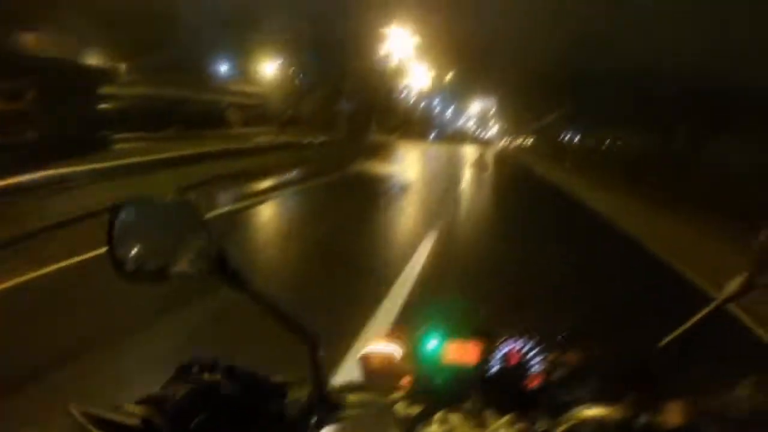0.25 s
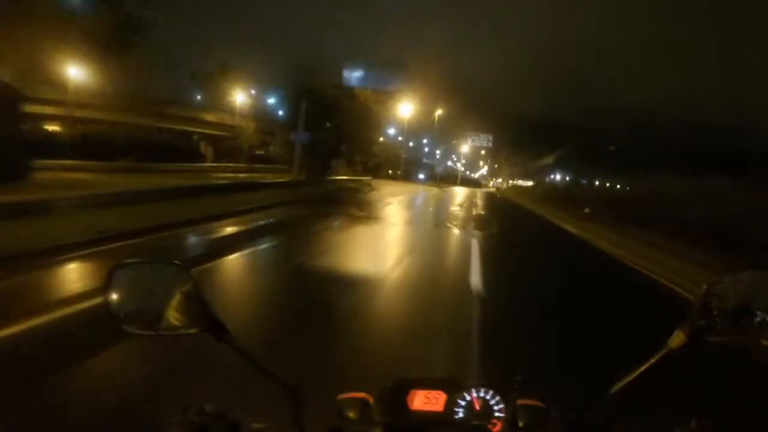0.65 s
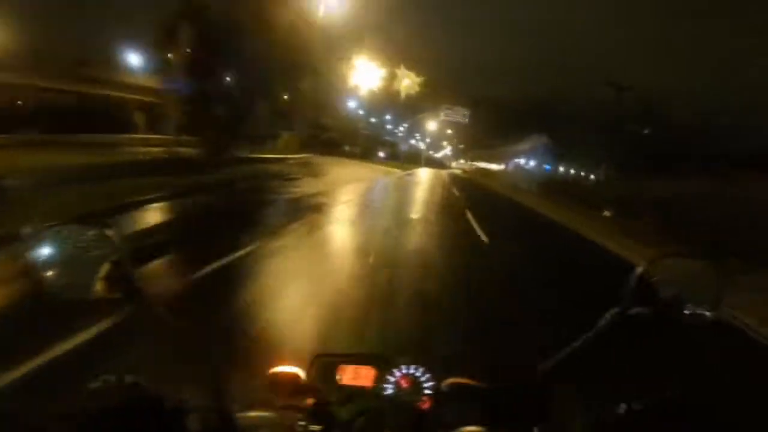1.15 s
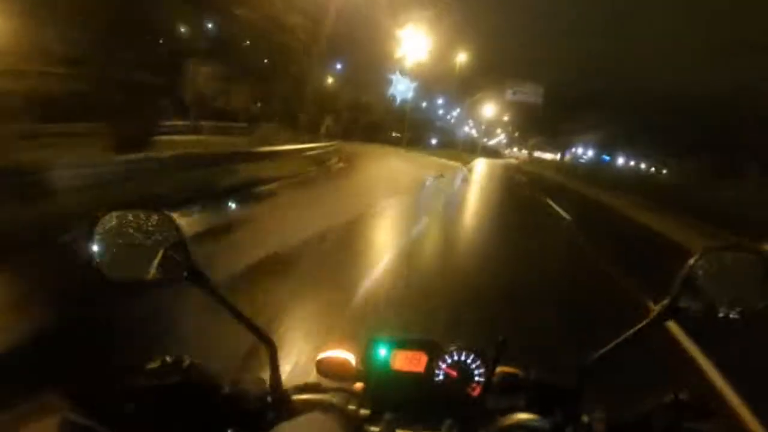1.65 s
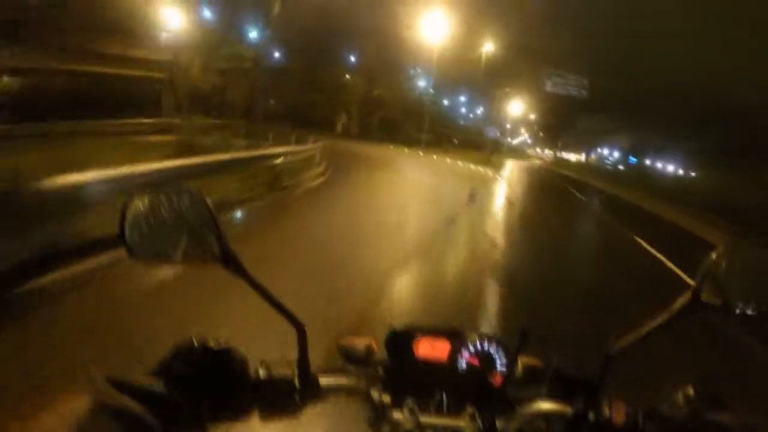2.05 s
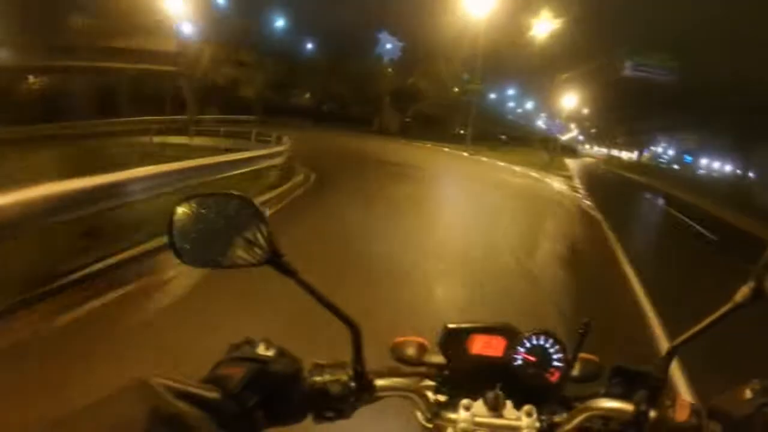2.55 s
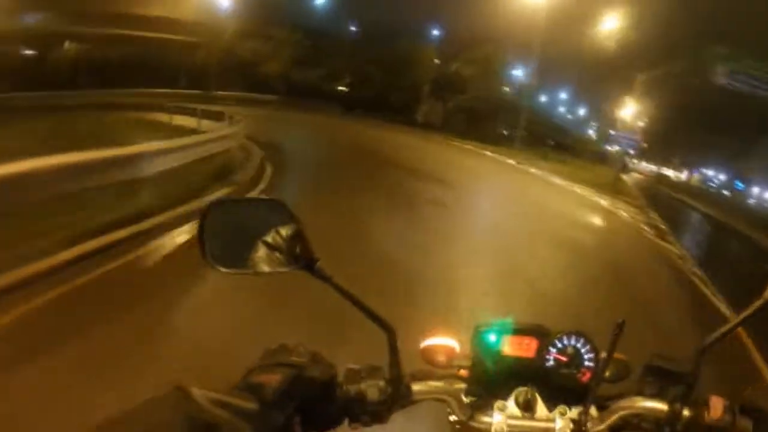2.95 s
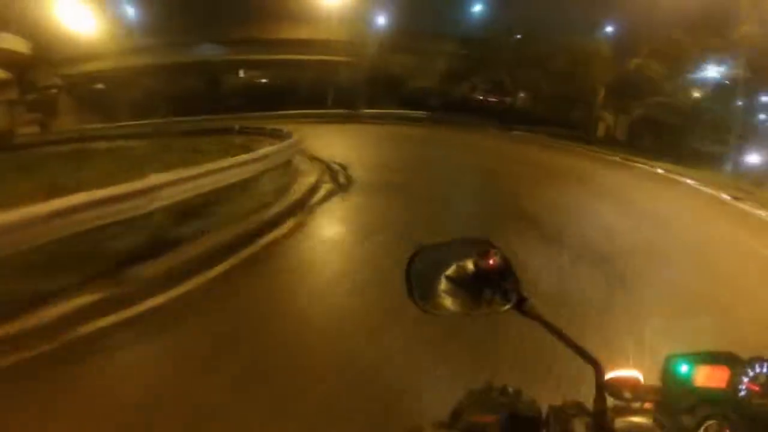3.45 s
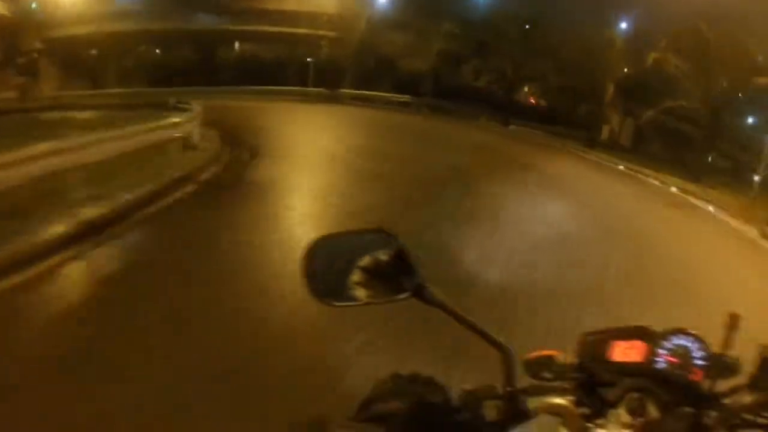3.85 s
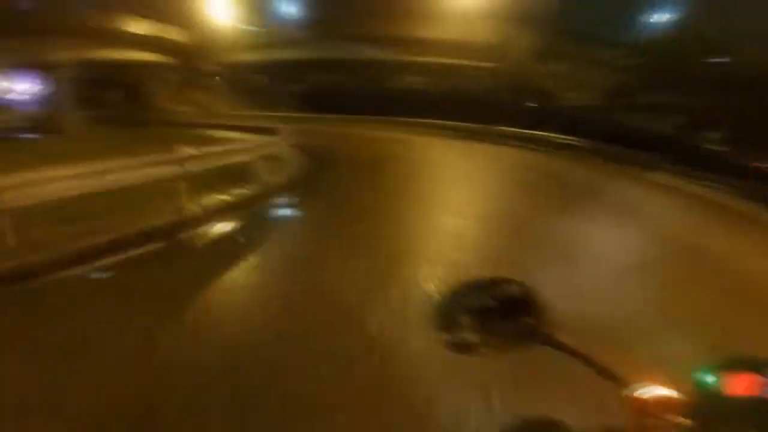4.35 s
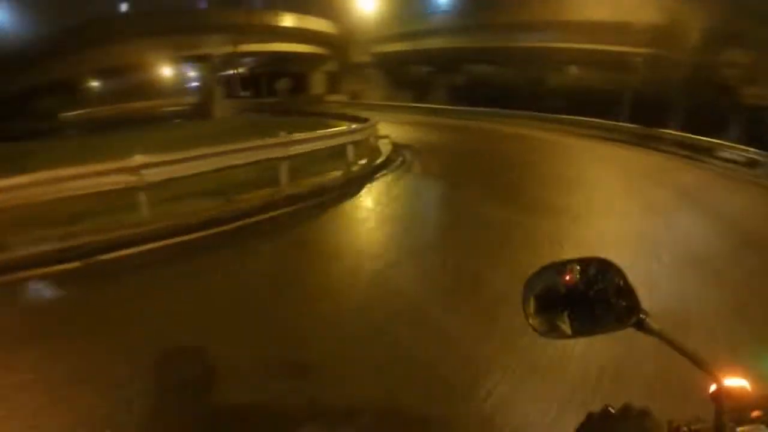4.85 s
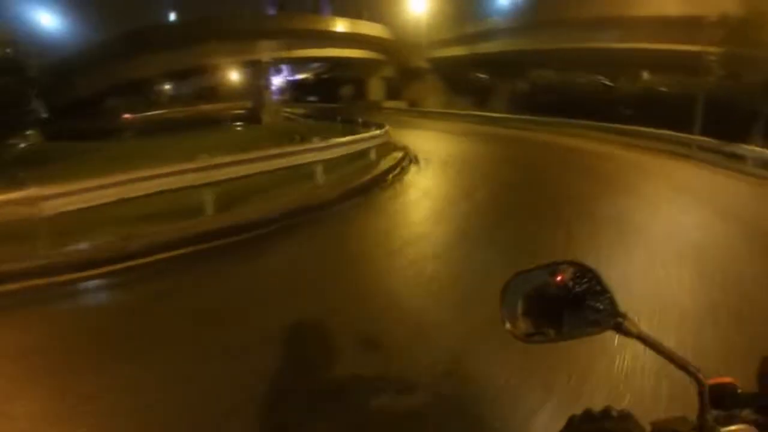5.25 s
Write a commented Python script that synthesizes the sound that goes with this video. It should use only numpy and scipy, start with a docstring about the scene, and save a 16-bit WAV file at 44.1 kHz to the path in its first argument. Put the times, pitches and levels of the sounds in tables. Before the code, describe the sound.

A single-cylinder motorcycle slows on a wet road, heard close from the rider's helmet. For the first second, heavy low wind thumps hit the microphone over a gritty, hollow rush of air, tyre roar and hissing spray. These ease steadily as the faint engine note sinks until about 4 seconds. From around 0.8 seconds a high, throbbing rasp of gears and chain with thin squeals comes in, strongest between 1.3 and 2.6 seconds, then fading. Loose parts knock near 1.8 seconds, a small metal ping comes at 2.5, and a sharp clack at 2.9. The chain ticks rapidly around 3.5 to 4 seconds, in the quietest stretch, ending with a click. At about 4.2 seconds the throttle opens gently with soft intake noise and exhaust puffs. Parts rattle from 4.4 to 4.7 and again near 5.1, while light valve ticking and low rumble continue to 5.5 seconds.

```python
"""A single-cylinder motorcycle slows on a wet road at night, heard close from a helmet microphone.
On the overrun its gears and chain rasp in step with the sinking crank speed; it leans into a ramp
and the throttle opens again. Wind buffets the helmet right at the microphone and the tyres hiss
through the water below, coloured by the hollow camera housing. Loose parts click over bumps."""
import sys
import numpy as np
from scipy import signal
from scipy.fft import rfft, irfft
from scipy.io import wavfile
from scipy.ndimage import uniform_filter1d

SR = 44100
rng = np.random.default_rng(int(sys.argv[2]) if len(sys.argv) > 2 else 0)


def dump_mix(stems):
    """Bounce the given channels to the path in sys.argv[1] as a 16-bit WAV at rate SR."""
    frames = np.atleast_2d(stems).T  # one column per channel
    limited = np.clip(frames, -1, 1)  # hard clip at full scale
    pcm = np.round(limited * 32767).astype(np.int16)
    wavfile.write(sys.argv[1], SR, pcm)


N = 242991
TIME = np.arange(N) / SR
TICK_PEAK_S, SIZZLE_PEAK_S = 3.666, 1.156  # these also align the rasp's throb and the valve ticks
# spectrum of small eddies and exhaust puffs: f/Hz, level/dB
EDDY_SPECTRUM = [(70, -2.5), (95, 0), (115, -0.5), (135, -5.5), (165, -9), (260, -39)]


def gear_rasp(turns):
    """Slack gears rub harder at fixed crank angles; modes near the rubbing's centre ring most."""
    # rubbing of gears and chain: t/s, level/dB, centre f/Hz
    rubbing = [(0, -79, 4400), (.6, -72, 4300), (.8, -56, 4200), (1.1, -60, 4440), (1.3, -51.5, 5000),
               (1.55, -50.5, 4770), (2.0, -55.5, 4900), (2.25, -53.5, 4500), (2.5, -55.5, 4570),
               (3.1, -58, 4300), (3.4, -63, 4250), (4.12, -72, 4200), (5.51, -85, 4226)]
    # throb: t/s, then depth/dB at one, two, three and four times a turn
    throb_depths = [(0, 1, 1, 0, 0), (.8, .5, 2, 0, 0), (1.3, 1, 1.8, 1.5, 0), (1.48, 1, 1.5, 2.6, 0),
                    (1.62, 4, .7, 2.8, .5), (1.8, .5, .5, 1.8, .5), (2.15, 0, 1.3, 1.2, 1.4),
                    (2.7, 0, .8, .5, 2.4), (3.2, 0, 2.2, 0, 1), (5.51, 0, 3, 0, 1)]
    # metal modes: f/Hz, width/Hz, level/dB
    modes = [(3910, 350, -5), (4356, 600, -3.5), (4924, 410, 0), (5660, 610, -2), (6060, 630, 0.5)]
    # three squeals in the rasp, a path each: t/s, f/Hz, level/dB
    squeal_paths = [
        [(0.5, 4220, -75), (.85, 4300, -60), (1.1, 4300, -64), (1.3, 4360, -56), (1.62, 4440, -52.5),
         (2.03, 4410, -62), (2.2, 4390, -53.5), (2.3, 4480, -56), (2.45, 4490, -67), (2.8, 4370, -66),
         (3.3, 4320, -71), (3.8, 4190, -68)],
        [(0.6, 4770, -68), (1.15, 4710, -64), (1.4, 4720, -60), (1.52, 4710, -63), (1.63, 4700, -54),
         (1.74, 4720, -60), (1.88, 4840, -53), (2.05, 4750, -59), (2.25, 4650, -59), (2.6, 4760, -61),
         (3.2, 4830, -66), (3.7, 4830, -76)],
        [(1.05, 5100, -72), (1.25, 5260, -57), (1.38, 5230, -55), (1.48, 5340, -51), (1.63, 5340, -62),
         (1.78, 5240, -57), (2.0, 5200, -72)],
    ]
    level_db, centre_hz = in_time(rubbing)
    angle = 2 * np.pi * (turns - np.interp(TICK_PEAK_S, TIME, turns))
    throb_db = sum(depth * np.cos(k * angle) for k, depth in enumerate(in_time(throb_depths), 1))
    metal = sum(from_db(db) * noise_ring(hz, width) / (1 + ((hz - centre_hz) / 1100) ** 2)
                for hz, width, db in modes)
    rasp = from_db(level_db) * even(metal, seconds=0.0054)
    squeals = sum(squeal(path) for path in squeal_paths)
    return even(from_db(throb_db), seconds=0.22) * (rasp + squeals)


def squeal(path):
    """A narrow ring slides in pitch and dies away beyond the ends of its path."""
    hz, level_db = in_time(path)
    outside_s = np.abs(TIME - np.clip(TIME, path[0][0], path[-1][0]))
    ring = even(noise_ring(hz, width_hz=75), seconds=0.033)
    return from_db(level_db) * np.exp(-outside_s / 0.15) * ring


def engine_note(turns, speed):
    """Faint, unsteady harmonics follow the crank and fade, except where the exhaust pipe resonates."""
    # harmonics: multiple of the crank speed, level/dB
    orders = [(3, -11), (4, -2.5), (5, -17), (6, -11), (7, 5), (10, -6)]
    pipe_hz, pipe_width_hz = 112, 46
    fading = from_db(-60 - 5 * TIME)
    note = 0
    for order, db in orders:
        drone = from_db(-56.5) * bell(order * speed, pipe_hz, pipe_width_hz)
        gain = (fading + drone) * from_db(db + 1.7 * drift(3))
        note = note + gain * np.sin(2 * np.pi * order * turns + 0.5 * drift(7.6))
    return note


def chain_ticks(turns):
    """The slack chain ticks twice a turn, louder and louder until the throttle takes up the slack."""
    # two close modes whose beat roughens each tick: f/Hz, width/Hz, level/dB
    modes = [(4150, 100, -3), (4470, 110, 0)]
    level_db = -61.7 + swell_db(TICK_PEAK_S, hold_s=0.32, rise_db_per_s=9, fade_db_per_s=160)
    metal = even(sum(from_db(db) * noise_ring(hz, width) for hz, width, db in modes), seconds=0.011)
    return from_db(level_db) * bursts(2 * turns, TICK_PEAK_S, share=0.38, uneven_db=1.2) * metal


def sizzle(turns):
    """One brief scrape per crank turn rings very high."""
    level_db = -63.5 + swell_db(SIZZLE_PEAK_S, hold_s=0.21, rise_db_per_s=160, fade_db_per_s=35)
    ring = even(noise_ring(hz=8540, width_hz=130), seconds=0.006)
    return from_db(level_db) * bursts(turns, SIZZLE_PEAK_S, share=0.33, uneven_db=1.5) * ring


def valve_clatter(turns):
    """The valve gear ticks softly, once a turn on the overrun and once per engine cycle under load."""
    # ticks: t/s, level/dB each turn, level/dB each cycle
    levels = [(0, -85, -65), (.5, -85, -67), (1, -74, -82), (1.25, -65, -88), (1.9, -65, -88),
              (2.6, -69, -88), (3.1, -82, -86), (4.15, -88, -80), (4.6, -88, -69.5), (5.51, -88, -70)]
    # their hiss: f/Hz, level/dB
    spectrum = [(4500, 5), (6200, 4), (7300, 5), (8200, -5), (9800, -2.5), (10800, -12), (13000, -14)]
    turn_db, cycle_db = in_time(levels)
    each_turn = from_db(turn_db) * bursts(turns, SIZZLE_PEAK_S, share=0.24, uneven_db=3.5)
    each_cycle = from_db(cycle_db) * bursts(turns / 2, at_s=4.748, share=0.2, uneven_db=3.5)
    return (each_turn + each_cycle) * noise(spectrum)


def hums(speed, air_db):
    """Two wavering hums, the higher taking over at low speed; a zing peaks around one crank speed."""
    low_db = -55.5 + 0.98 * air_db
    high_db = -68 + 4.5 * bell(TIME, 3.86, 0.67)
    zing_db = -52.5 + air_db + 7.5 * bell(speed, 60.7, 8.7)
    low = from_db(low_db) * noise_ring(hz=474.2, width_hz=30)
    high = from_db(high_db) * noise_ring(hz=580.6, width_hz=30)
    zing = from_db(zing_db + 2.0 * drift(7.8)) * noise_ring(hz=2440, width_hz=190)
    return low + high + zing


def open_throttle(turns):
    """Out of the bend the throttle opens: air is gulped and puffed out once per engine cycle."""
    # intake noise: f/Hz, level/dB
    intake_spectrum = [(550, -4), (800, 1), (1150, -3), (1600, -1), (2300, -4), (3100, -9), (4500, -12)]
    opens_s, opening_s = 4.18, 0.2
    opening = np.clip((TIME - opens_s) / opening_s, 0, 1)
    stroke_db = -0.5 * np.cos(np.pi * turns)
    intake = from_db(-60 + stroke_db) * noise(intake_spectrum)
    puffs = from_db(-56.5 - stroke_db) * noise(EDDY_SPECTRUM)
    return opening * (intake + puffs)


def firings(turns, uneven_db):
    """One slightly uneven exhaust pulse every second crank turn; unit power."""
    fires = np.diff(np.floor(turns / 2), prepend=0)
    return rms_one(fires * from_db(uneven_db * rng.standard_normal(N)))


def helmet_boom(turns, air_db):
    """Wind and exhaust share a low boom round the helmet; gusts set it ringing, eddies flap above it."""
    # boom between gusts: t/s, level/dB
    levels = [(0, -41), (.7, -40), (1.2, -41.5), (1.45, -45.5), (1.75, -41), (2.2, -45.5), (2.35, -51.5),
              (2.65, -48.5), (3, -49), (4.25, -51), (4.5, -48.5), (4.95, -49.5), (5.15, -45.5), (5.51, -45)]
    # its spectrum: f/Hz, level/dB
    spectrum = [(30, -33), (48, -8.5), (58, -8.5), (66, 1), (77, -9), (87, -3), (98, -13.5), (125, -35),
                (200, -56)]
    # gusts thumping the helmet: peak t/s, level/dB, length/s, f/Hz
    gusts = [(0.054, -25, 0.029, 73), (0.15, -43, 0.024, 85), (0.19, -30, 0.052, 77),
             (0.263, -31.5, 0.048, 86), (0.305, -25.5, 0.039, 74.5), (0.409, -32.5, 0.056, 72.5),
             (0.49, -31, 0.025, 66), (0.566, -25.5, 0.072, 65.3), (0.595, -39, 0.032, 125),
             (0.636, -32, 0.016, 75.4), (0.795, -29.5, 0.024, 71), (0.901, -29.5, 0.027, 70.5),
             (1.032, -36, 0.054, 76.6), (1.231, -37.5, 0.11, 70.7), (2.148, -42, 0.041, 67.4),
             (2.667, -45, .1, 67), (4.48, -43, 0.041, 76), (4.753, -44.5, 0.13, 65.4),
             (5.118, -41, 0.034, 78), (5.2, -44, 0.022, 87)]
    boom_db, = in_time(levels)
    thumps = 0
    for (s, db, length, hz), phase in zip(gusts, rng.uniform(0, 2 * np.pi, len(gusts))):
        tone = np.sqrt(2) * np.sin(2 * np.pi * hz * (TIME - s) + phase)
        thumps = thumps + from_db(db) * bell(TIME, s, length) * tone
    push = rng.standard_normal(N) + from_db(-6) * firings(turns, uneven_db=0.5)
    eddies = from_db(-40 + 1.49 * air_db) * even(noise(EDDY_SPECTRUM), seconds=0.52)
    return from_db(boom_db) * even(colour(push, spectrum), seconds=0.3) + thumps + eddies


def air_sway(air_db):
    """Air sways slowly at the microphone, more so as the bike tips into the bend."""
    # deep rumble: f/Hz, level/dB
    spectrum = [(6, -3), (13, 0), (20, 10), (28, 3), (42, -2), (70, -34)]
    tip_in_db = 5.5 * bell(TIME, 1.8, 0.55)
    return from_db(-42 + 0.74 * air_db + tip_in_db) * even(noise(spectrum), seconds=0.52)


def housing_rush(air_db):
    """Gritty air rushes through the housing, and the road below throws the sound back."""
    # the rush: f/Hz, level/dB
    spectrum = [(700, -29), (1200, -20.5), (1350, -11), (1500, -1), (1700, 0), (1850, -5.5), (2020, -10),
                (2220, -6.5), (2430, -3), (2650, -8.5), (2950, -12), (3400, -20), (4500, -24.5),
                (8000, -33.5)]
    # gusts that lift it: peak t/s, rise/dB, length/s
    surges = [(0.034, 1, 0.018), (0.092, 3.5, 0.034), (0.29, 3.5, 0.061), (0.328, 3.5, .016),
              (0.474, 2.5, .035), (.68, 2, 0.026)]
    surge_db = sum(db * bell(TIME, s, length) for s, db, length in surges)
    gritty_air = rng.standard_normal(N) + 0.37 * droplets(per_s=1300, spread_db=4.0)
    rush = even(colour(gritty_air, spectrum), seconds=0.69)
    return from_db(-39 + 1.126 * air_db + surge_db) * road_echo(rush)


def visor_whoosh(air_db):
    """Air hits the visor head-on, making the housing whistle briefly, then slips past."""
    # air on the visor: f/Hz, level/dB
    spectrum = [(650, -10), (820, 3), (930, -0.5), (1100, -7.5), (2400, -7), (2800, -0.5), (3200, -5.5),
                (3700, -7.5), (4500, -33)]
    blast = from_db(-43 - 26 * TIME)
    slipstream = from_db(-59.5 + 0.13 * air_db)
    ring = even(noise_ring(hz=1656, width_hz=53), seconds=0.04)
    whistle = from_db(-43) * bell(TIME, 0.066, 0.088) * ring
    return (blast + slipstream) * noise(spectrum) + whistle


def tyre_roar(air_db):
    """The tyres roar on the road, sinking with the airflow as the bike slows."""
    # the roar: f/Hz, level/dB
    spectrum = [(120, 0), (165, -2), (220, 0.5), (290, -3), (390, -2.5), (480, -4), (530, -7.5), (650, -4),
                (740, -10), (850, -12.5), (1100, -12.5), (1500, -13.5), (3000, -32), (6000, -48)]
    return from_db(-41.5 + air_db) * even(noise(spectrum), seconds=0.52)


def tyre_spray():
    """Water thrown up by the tyres hisses and spatters."""
    # spray: t/s, level/dB
    levels = [(0, -51), (.45, -53.5), (1.8, -53), (2.1, -55.5), (2.5, -57), (3, -60), (3.7, -62),
              (4.3, -64), (4.95, -65), (5.51, -62.5)]
    # its spectrum: f/Hz, level/dB
    spectrum = [(1500, -23), (3000, -11), (4000, 2), (4600, 1.5), (6100, 3), (6700, -1), (7500, -1.5),
                (8100, -6.5), (9000, -7.5), (9800, -8.5), (10600, -14), (13000, -18), (15200, -27)]
    level_db, = in_time(levels)
    water = rng.standard_normal(N) + 0.37 * droplets(per_s=300, spread_db=5.0)
    return from_db(level_db) * colour(water, spectrum)


def knocks():
    """Loose parts knock, each in a short chatter of contacts that rings the housing."""
    # knocks: t/s, level/dB, centre f/Hz, spread/octaves, decay/s
    hits = [(.420, -46.5, 11500, 0.67, .004), (1.716, -39, 1500, 1.1, 0.01), (1.8043, -37, 1900, 1.2, 0.01),
            (1.805, -39.5, 6000, 0.46, 0.009), (1.847, -39, 3000, 1.5, 0.01), (1.870, -60, 12550, .3, .004),
            (2.857, -45, 4000, 1.1, 0.008), (2.892, -39.5, 6000, 1.2, 0.014),
            (3.290, -56, 9000, 0.46, 0.0044), (3.338, -50.5, 5000, 0.51, 0.0074),
            (4.062, -42.5, 6000, 1.9, 0.003), (4.363, -53, 3180, .4, .008), (4.384, -49, 2580, 0.7, .012),
            (4.407, -48, 2600, 0.56, 0.014), (4.404, -53, 1000, 0.48, 0.032),
            (4.426, -45, 1140, 0.25, 0.015), (4.427, -47.5, 2960, 0.54, 0.016),
            (4.455, -43.5, 2200, 0.53, 0.011), (4.454, -49, 1150, 0.27, 0.014),
            (4.480, -50, 2800, 0.58, .012), (4.518, -48, 2740, 0.9, 0.016), (4.562, -57, 7000, .45, .008),
            (4.607, -48, 3000, 0.98, 0.009), (4.623, -46, 3540, 0.42, 0.008),
            (4.634, -52, 5200, 0.27, .006), (4.639, -43.5, 2420, 0.21, 0.0089),
            (4.643, -51, 5800, 0.63, 0.0091), (4.650, -46, 2000, 0.76, .005),
            (5.105, -50, 3000, 0.98, 0.0069), (5.166, -44.5, 2620, 1.0, 0.022)]
    # housing modes: f/Hz, width/Hz, level/dB
    modes = [(650, 290, 4), (1230, 410, 9), (1494, 230, 13.5), (2410, 210, 10), (3340, 660, -1),
             (3920, 500, -1.5), (5320, 760, -2), (6440, 490, -5.5), (7200, 460, -2.5), (10100, 1700, -14),
             (12500, 2800, -22)]
    grit_db, rise_share = 6.5, 0.19
    out, size = np.zeros(N + SR), 8192
    t, hz = np.arange(size) / SR, np.fft.rfftfreq(size, 1 / SR) + 1
    for s, level_db, centre_hz, octaves, decay in hits:
        grain, force = rng.standard_normal((2, size))
        chatter = grain * from_db(grit_db * force)
        rung = sum((-1) ** k * from_db(db) * resonate(chatter, mode_hz, width)
                   for k, (mode_hz, width, db) in enumerate(modes))
        # hard contacts ring high, soft ones low
        rung = irfft(rfft(rung) * np.exp(-0.5 * (np.log2(hz / centre_hz) / octaves) ** 2))
        rise = rise_share * decay
        shape = np.minimum(t / rise, 1) * np.exp(-np.maximum(t - rise, 0) / decay)
        start = int(s * SR)
        out[start:start + size] += from_db(level_db) * shape * even(rung, seconds=0.012)
    return out[:N]


def clack():
    """A hard part bounces on the sharpest bump, striking each mode with a strength of its own."""
    # bounces: t/s, level/dB
    bounces = [(2.891, -46), (2.8954, -34), (2.899, -46), (2.902, -40.5)]
    # the part's modes: f/Hz, width/Hz, level/dB
    modes = [(280, 66, -11), (537, 110, -13), (900, 120, -11), (1570, 77, 2.5), (2280, 120, -6),
             (2650, 90, -3), (3330, 160, -12), (3940, 130, -8), (4350, 130, -6), (4900, 81, -17),
             (5300, 160, -12), (6300, 120, -18), (6850, 110, -12), (7600, 120, -18), (8600, 100, -16),
             (9980, 87, -25)]
    out, t = np.zeros(N + SR), np.arange(4096) / SR
    for s, level_db in bounces:
        start = int(s * SR)
        for k, (hz, width, db) in enumerate(modes):
            strength = (-1) ** k * from_db(level_db + db + 1.7 * rng.standard_normal())
            ring = np.sin(2 * np.pi * hz * t) * np.exp(-np.pi * width * t)
            out[start:start + len(t)] += strength * ring
    return out[:N]


def pings():
    """Small metal parts snap and ring in short, high tones."""
    # snaps: t/s, f/Hz, level/dB, decay/s
    snaps = [(2.457, 2340, -30, .0045), (2.457, 2480, -35, .006), (4.0622, 6350, -44, .004),
             (4.069, 7380, -55, .007), (4.063, 10400, -56, .005)]
    out, rise_s = 0, 0.00084
    for s, hz, level_db, decay in snaps:
        age = np.maximum(TIME - s, 0)
        shape = (1 - np.exp(-age / rise_s)) * np.exp(-age / decay)
        out = out + from_db(level_db) * shape * np.sin(2 * np.pi * hz * age)
    return out


def road_echo(x):
    """Add one reflection off the road, its delay wandering as the head moves; unit power."""
    delay_s = 0.0061 + 0.00017 * drift(0.54)
    return rms_one(x + from_db(-15.5) * np.interp(TIME - delay_s, TIME, x))


def from_db(db):
    """Decibels to gain."""
    return 10 ** (np.asarray(db) / 20)


def rms_one(x):
    """Scale to unit power."""
    return x / np.sqrt(np.mean(x ** 2) + 1e-20)


def even(x, seconds):
    """Hold the short-term power at 1."""
    size = int(seconds * SR / 2) + 1
    return x / np.sqrt(uniform_filter1d(uniform_filter1d(x * x, size), size) + 1e-12)


def in_time(rows):
    """One curve for each column after the time column."""
    s, *columns = np.transpose(rows)
    return [np.interp(TIME, s, column) for column in columns]


def bell(x, centre, width):
    """A smooth hump of height 1, `width` wide at half height."""
    return 0.5 ** ((2 * (x - centre) / width) ** 2)


def swell_db(peak_s, hold_s, rise_db_per_s, fade_db_per_s):
    """Rise to 0 dB, hold, fade."""
    before_s, after_s = np.maximum(peak_s - TIME, 0), np.maximum(TIME - peak_s - hold_s, 0)
    return -rise_db_per_s * before_s - fade_db_per_s * after_s


def bursts(cycles, at_s, share, uneven_db):
    """One short swell per cycle, lasting `share` of it, one of them peaking at `at_s`; unit power."""
    phase = cycles - np.interp(at_s, TIME, cycles)
    beat = np.round(phase).astype(int)
    return rms_one(bell(phase, beat, share) * from_db(uneven_db * rng.standard_normal(N)[beat]))


def colour(x, spectrum):
    """Give a signal a spectrum whose ends fall away steeply; unit power."""
    hz, level_db = np.transpose(spectrum)
    octave, points = np.log2(np.fft.rfftfreq(N, 1 / SR) + 0.1), np.log2(hz)
    outside = np.abs(octave - np.clip(octave, points[0], points[-1]))
    gain = from_db(np.interp(octave, points, level_db) - 20 * outside)
    return rms_one(irfft(rfft(x) * gain, N))


def noise(spectrum):
    """Coloured noise; unit power."""
    return colour(rng.standard_normal(N), spectrum)


def drift(rate_hz):
    """Smooth random wander, mostly slower than `rate_hz`; unit power."""
    hz = np.fft.rfftfreq(N, 1 / SR)
    return rms_one(irfft(rfft(rng.standard_normal(N)) / (1 + (hz / rate_hz) ** 2), N))


def droplets(per_s, spread_db):
    """Random impacts, many small and a few large; unit power."""
    sizes = from_db(spread_db * np.minimum(rng.exponential(1, N), 4)) * rng.choice([-1, 1], N)
    return rms_one(sizes * (rng.random(N) < per_s / SR))


def resonate(x, hz, width_hz):
    """A two-pole resonance with gain 1 at its peak."""
    r = np.exp(-np.pi * width_hz / SR)
    feedback = [1, -2 * r * np.cos(2 * np.pi * hz / SR), r * r]
    return signal.lfilter(np.array([1, 0, -1]) * (1 - r * r) / 2, feedback, x)


def noise_ring(hz, width_hz):
    """Noise in a steep-sided resonance; unit power."""
    pole = np.exp(-np.pi * width_hz * 1.5 / SR)
    slow = signal.lfilter([1], [1, -2 * pole, pole * pole], rng.standard_normal((2, N)))
    phase = 2 * np.pi * np.cumsum(hz * np.ones(N)) / SR
    return rms_one(slow[0] * np.cos(phase) + slow[1] * np.sin(phase))


def scene():
    """Engine, wind, tyres and loose parts meet at one microphone on the helmet."""
    # engine speed: t/s, crank speed/(turns per s)
    crank = [(0, 68), (.7, 65.4), (1.0, 64), (1.13, 59), (1.3, 58), (1.45, 55.5), (1.6, 52.7), (1.8, 50.7),
             (2.05, 46.3), (2.4, 42.2), (2.7, 38.2), (3.0, 33.5), (3.2, 32.5), (3.42, 29.8), (3.64, 27.1),
             (3.9, 26.3), (4.05, 26), (4.5, 29), (5.51, 29)]
    # airflow, sinking as the bike slows: t/s, level/dB
    airflow = [(0, 1), (.2, -3), (.8, -3), (1.4, -7), (1.8, -7), (2.05, -9.5), (2.7, -11), (3.3, -12),
               (3.9, -13), (4.9, -14), (5.51, -12)]
    speed, = in_time(crank)
    air_db, = in_time(airflow)
    turns = np.cumsum(speed) / SR
    boom = helmet_boom(turns, air_db)
    flutter = from_db(1.05 * drift(18))  # gusts flutter rush and spray together
    ride = boom + air_sway(air_db) + tyre_roar(air_db) + flutter * (housing_rush(air_db) + tyre_spray())
    engine = engine_note(turns, speed) + gear_rasp(turns) + chain_ticks(turns) + sizzle(turns)
    engine += valve_clatter(turns) + hums(speed, air_db) + open_throttle(turns)
    return (engine + ride + visor_whoosh(air_db) + knocks() + clack() + pings())[None]


def record(dry):
    """The top treble is cut steeply."""
    cutoff_hz = 15250
    return signal.sosfilt(signal.ellip(12, 0.1, 80, cutoff_hz, fs=SR, output="sos"), dry)


dry = scene()
out = record(dry)
dump_mix(out)
```